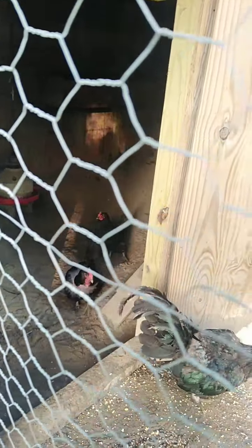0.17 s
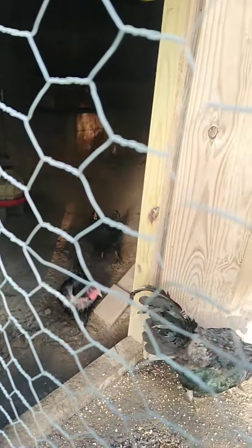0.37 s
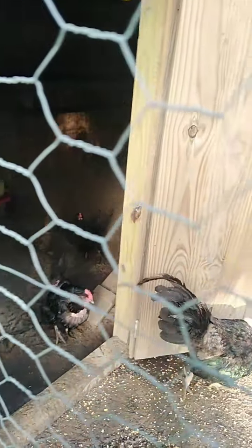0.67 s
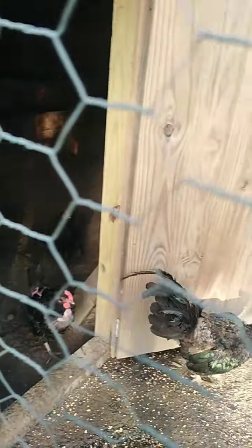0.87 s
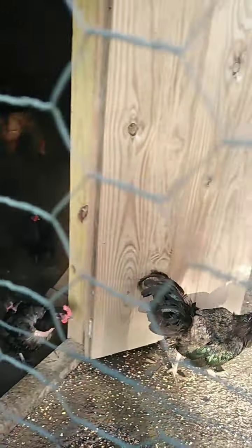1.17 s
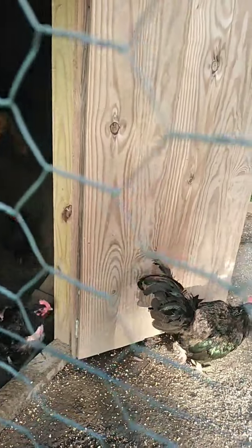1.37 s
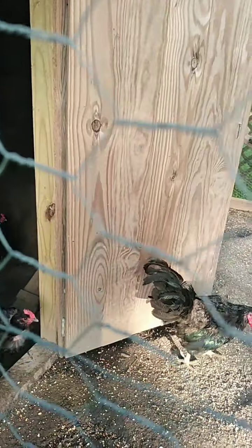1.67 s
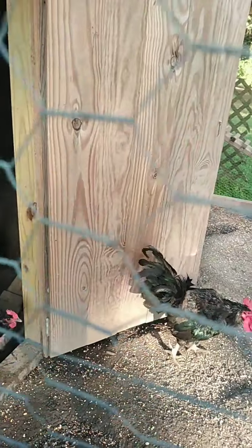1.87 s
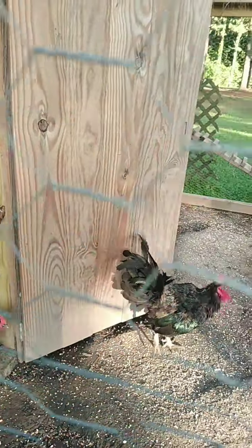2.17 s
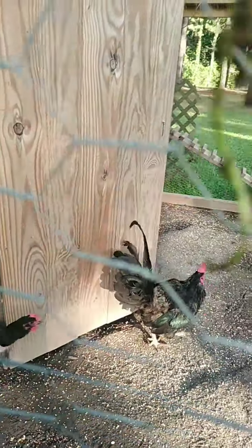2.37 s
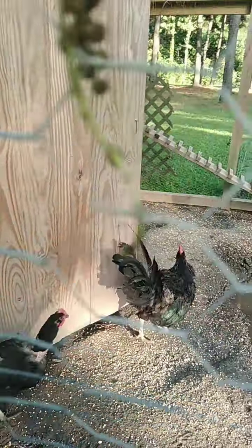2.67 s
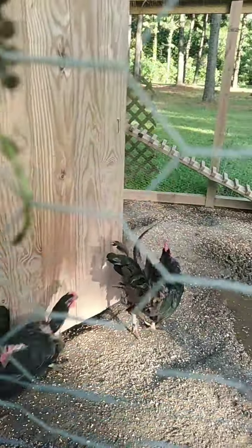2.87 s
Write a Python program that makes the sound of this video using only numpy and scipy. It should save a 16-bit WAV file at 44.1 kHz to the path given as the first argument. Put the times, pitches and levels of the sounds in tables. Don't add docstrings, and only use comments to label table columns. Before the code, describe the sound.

Hens give short throaty clucks beside a wooden coop in an outdoor run, then a shriller bird squawks; wind thumps a handheld stereo microphone, mostly on the right, and feet scuff gravel.

```python
import sys
import numpy as np
from scipy import signal
from scipy.fft import rfft, irfft
from scipy.io import wavfile
from scipy.ndimage import uniform_filter1d, minimum_filter1d

SR = 44100
rng = np.random.default_rng(int(sys.argv[2]) if len(sys.argv) > 2 else 0)


def store_pcm(level_fs):
    pcm = np.round(np.clip(level_fs, -1, 1) * 32767).astype(np.int16)
    wavfile.write(sys.argv[1], SR, np.atleast_2d(pcm).T)


def natural_amplitude(level_db):
    exponent = np.asarray(level_db, float) / 20
    return 10 ** exponent


N = 132300
T = np.arange(N) / SR


def in_time(rows):
    return np.interp(T, *np.transpose(rows))


def at_hz(points, hz):
    p = np.array(points)
    return np.interp(np.log(hz), np.log(p[:, 0]), p[:, 1])


def rms_one(x):
    return x / np.sqrt(np.mean(x ** 2) + 1e-20)


def drift(rate):
    r = np.exp(-20 * np.pi * rate / SR)
    noise = rng.standard_normal(N // 10 + 4002)
    slow = signal.lfilter([1], [1, -2 * r, r * r], noise)[4000:]
    return np.interp(np.arange(N) / 10, np.arange(len(slow)), rms_one(slow - slow.mean()))


def colour(x, points, skirt_db=-40):
    low_end = (points[0][0] / 2, points[0][1] + skirt_db)
    high_end = (points[-1][0] * 2, points[-1][1] + skirt_db)
    ends = [low_end] + list(points) + [high_end]
    hz = np.arange(N // 2 + 1) * SR / N + 1
    return irfft(rfft(x) * natural_amplitude(at_hz(ends, hz)), N)


def swell(t, rise, hold, fall):
    attack = np.sin(np.pi / 2 * np.clip(t / rise, 0, 1)) ** 2
    return attack * np.exp(-np.maximum(t - hold, 0) / fall)


def wind():
    # t/s, level/dB, f/Hz
    gusts = [(0.035, -28, 115), (0.077, -30, 165), (0.126, -28, 108), (0.182, -35.5, 125), (0.403, -36, 94),
             (0.505, -20.5, 138), (0.55, -25.5, 99), (0.59, -43, 119), (0.641, -25.5, 142),
             (0.674, -27, 154), (0.705, -35.5, 129), (0.766, -27, 103.4), (0.955, -30.5, 102.5),
             (0.974, -33.5, 107), (1.004, -33, 120), (1.068, -35, 107), (1.142, -36, 124), (1.312, -39, 76),
             (1.33, -27, 106), (1.358, -23, 97), (1.386, -28.5, 136), (1.402, -44, 108), (1.568, -27, 114),
             (1.598, -22, 124), (1.624, -18, 123), (1.659, -28.5, 144), (1.699, -31, 93.5),
             (1.723, -21.5, 205), (1.781, -24, 173), (1.824, -27.5, 108), (1.854, -24, 136),
             (1.877, -23, 135), (1.909, -21, 193), (1.99, -41, 130), (2.039, -17, 103), (2.072, -15, 196),
             (2.129, -17, 204), (2.157, -29, 98), (2.174, -50, 133), (2.207, -9, 159), (2.226, -17.5, 190),
             (2.245, -13.5, 118), (2.281, -7.5, 179), (2.307, -27, 86.4), (2.325, -14, 150),
             (2.352, -46, 116), (2.37, -37, 152), (2.394, -12.5, 152), (2.414, -17.5, 171),
             (2.43, -18.5, 142), (2.45, -31, 128), (2.505, -23, 147), (2.522, -20.5, 163),
             (2.572, -19.5, 163), (2.597, -28.5, 154), (2.637, -29.5, 137), (2.745, -29, 142),
             (2.768, -17, 135), (2.787, -24, 116), (2.956, -39, 117)]
    # t/s, level/dB
    right_breeze = [(0, -35.5), (.17, -41.5), (.25, -48), (.37, -49.5), (.45, -41), (.8, -39), (.88, -54),
                    (1, -40.5), (1.27, -52), (1.35, -41), (1.97, -34.5), (2.2, -23.5), (2.58, -31.5),
                    (2.68, -41), (2.8, -31.5), (2.88, -43.5), (3, -34)]
    # t/s, level/dB
    left_breeze = [(0, -73), (2.26, -100), (2.3, -57), (2.66, -62), (2.72, -73), (2.8, -58), (3, -63)]
    # f/Hz, level/dB
    breeze_colour = [(30, -107), (50, -1), (90, 5.5), (130, -3.5), (200, -8), (300, -12.5), (450, -23.5),
                     (700, -37)]
    gust_cycles, edge_db, breeze_db = 0.43, -6.5, -2.5
    thumps, push = np.zeros(N), np.zeros(N)
    for (s, db, hz), start in zip(gusts, rng.uniform(-1.04, 1, len(gusts))):
        shape = natural_amplitude(db) * np.exp(-.5 * ((T - s) * hz / gust_cycles) ** 2)
        thumps += shape * np.sin(np.pi * start + 2 * np.pi * hz * (T - s))
        push += shape
    edge = rms_one(colour(rng.standard_normal(N), [(150, -21.5), (300, -20.5), (600, -43.5)]))
    rough = natural_amplitude(edge_db) * edge * push ** 1.67 / push.max() ** .5
    thumps = colour(thumps, [(70, 0.015), (900, 0)], skirt_db=-15) + rough
    left, right = (rms_one(colour(rng.standard_normal(N), breeze_colour) * natural_amplitude(1.17 * drift(8.2)))
                   for _ in "LR")
    return np.array([natural_amplitude(in_time(left_breeze)) * left,
                     thumps + natural_amplitude(in_time(right_breeze) + breeze_db) * right])


def gravel():
    # t/s, level/dB
    scuff = [(0, -40), (.04, -46), (.055, -36.5), (.17, -55), (1.38, -60), (1.44, -37.5), (1.565, -26.5),
             (1.64, -41.5), (1.8, -48), (1.91, -52.5), (1.97, -29), (2.04, -35), (2.06, -34), (2.11, -39),
             (2.46, -48), (2.52, -44), (3, -53)]
    # f/Hz, level/dB
    gravel_colour = [(700, -23), (1500, -5.5), (2500, -2), (3400, -6), (4400, -2), (7000, 8), (9500, -6),
                     (14500, -14.5)]
    # f/Hz, level/dB
    right_shadow = [(1000, -2.5), (2500, -13), (4400, -21), (7000, -9), (14000, -7)]
    # t/s, peak level/dB, length/s
    tick_rows = [(0.283, -30, 0.00087), (0.438, -44, 0.024), (1.292, -45, 0.032), (1.835, -39.5, 0.048),
                 (1.969, -50, 0.00054), (1.999, -30, 0.0015), (2.22, -37, 0.06), (2.626, -43, 0.03),
                 (0.053, -46, 0.0036), (2.91, -47, 0.02)]
    gravel_db, grains_per_s, grain_db = 5.5, 2200, -29
    out, ticks = [], np.zeros(N)
    for s, db, length in tick_rows:
        ticks += natural_amplitude(db + 1.5) * swell(T - s, 0.0007, 0.0016, max(length, .001))
    clump = natural_amplitude(1.17 * drift(140))
    for shadow in ([(100, 0.0066), (200, 0.026)], right_shadow):
        hits = rng.random(N) < grains_per_s / SR
        grains = hits * natural_amplitude(5.3 * rng.exponential(1, N)) * rng.choice([-1, 1], N)
        rasp = natural_amplitude(grain_db) * rms_one(grains) + rng.standard_normal(N)
        rasp = rms_one(colour(rasp, gravel_colour))
        snap = rms_one(colour(rng.standard_normal(N), [(3000, 12), (7000, 27.3), (14000, 11.3)]))
        ground = natural_amplitude(in_time(scuff) + gravel_db) * clump * rasp
        out.append(colour(ground + ticks * snap, shadow, skirt_db=-1.5))
    return np.array(out)


def far_hiss():
    # f/Hz, level/dB
    low_part = [(300, -14), (1000, -5), (1400, 2.5), (1900, -0.5), (2500, 3.5), (3500, -7.5), (4500, 7),
                (5300, -3)]
    # f/Hz, level/dB
    high_part = [(7000, 9.5), (8500, -8), (12000, -14), (13500, -42)]
    hiss_db, right_db = -46, -67
    points = list(low_part) + list(high_part)
    hiss = [rms_one(colour(rng.standard_normal(N), points)) * natural_amplitude(hiss_db + drift(5.1) / 2) for _ in "LR"]
    return hiss * natural_amplitude([[0], [right_db]])


def calls(rows, beaks, throat, release_s, breath_db):
    wobble_depth, shimmer_db = .006, .8
    arch_per_s2, scoop, scoop_s = 12, .025, .005
    out, wobble = np.zeros((2, N)), drift(75)
    breath = rms_one(colour(rng.standard_normal(N), throat))
    k = np.arange(2, 23)[:, None] / 2
    lags = rng.integers(0, N, len(k))
    shimmer = natural_amplitude(shimmer_db * np.sqrt(k) * [np.roll(wobble, lag) for lag in lags])
    for (s, length, db, hz, pan_db), (beak_db, rattle, sag, attack_s) in zip(rows, beaks):
        on = (T >= s) & (T < s + length + 8 * release_s)
        t = T[on] - s
        middle = t - length / 2
        bend = 1 - sag * middle - arch_per_s2 * middle ** 2 - scoop * np.exp(-t / scoop_s)
        phase = 2 * np.pi * np.cumsum(hz * (bend + wobble_depth * wobble[on])) / SR
        open_db = np.clip(np.log2(k * hz / 600), 0, 1) * (beak_db - 80 * t)
        rattle_gain = np.where(k % 1, np.clip(rattle, 0, 1), 1)
        gains = natural_amplitude(at_hz(throat, k * hz) + open_db) * rattle_gain * shimmer[:, on]
        voice = np.sum(gains * np.sin(k * phase - k ** 2 / 2), axis=0)
        voice += natural_amplitude(breath_db + beak_db) * breath[on] * (1 + np.cos(phase))
        ports = natural_amplitude([[db + 5.0], [db + 2.5 - pan_db]])
        out[:, on] += ports * voice * swell(t, attack_s, length, release_s)
    return out


def clucks():
    # t/s, length/s, level/dB, f/Hz, left-right/dB
    rows = [(.488, 0.025, -40.5, 253, -2), (.663, 0.02, -29.5, 314.5, 4), (.778, 0.011, -25, 323, 2),
            (.830, 0.023, -37, 301, -2.5), (.906, 0.015, -30.5, 281.7, 0.5),
            (1.017, 0.027, -28.5, 320.3, 3.5), (1.138, 0.0051, -33, 275, -0.5),
            (1.215, 0.039, -39.5, 303.7, 1), (1.303, 0.044, -30.5, 335.5, 2.5),
            (1.352, 0.018, -29, 302.6, 2), (1.386, 0.0081, -32, 312, 6), (1.557, 0.024, -33.5, 314, 1.5),
            (1.762, 0.033, -32, 347, -2.5), (1.908, 0.068, -30.5, 334.4, -2),
            (2.052, 0.025, -36.5, 304.7, -11), (2.939, 0.019, -37, 293, -2), (2.988, 0.02, -33, 305, -1)]
    # beak opening/dB, half-pitch rattle/0-1, pitch sag/per s, attack/s
    beaks = [(1, .05, -2.5, .006), (0, .05, .3, .014), (6, .25, .2, .004), (7, .3, 7, .003),
             (-6, .1, 1, .006), (0, .03, .1, .007), (6, .4, 3, .003), (-8, .05, 1.5, .002),
             (0, .03, .3, .011), (-8, .15, .5, .006), (-6, .15, .5, .006), (-8, .15, .5, .015),
             (10, .03, .4, .009), (5, .25, -.1, .016), (-8, .05, .3, .015), (-6, .3, -3, .01),
             (6, .25, .3, .002)]
    # f/Hz, level/dB
    throat = [(250, -6), (330, -6.5), (660, 0), (1040, -18), (1350, -35.5), (1900, -26.5), (3100, -29.5),
              (3500, -49)]
    return calls(rows, beaks, throat, release_s=.009, breath_db=-18)


def squawks():
    # t/s, length/s, level/dB, f/Hz, left-right/dB
    rows = [
        (2.219, 0.019, -30, 439, 3),
        (2.236, 0.025, -27.5, 435, -3),
        (2.374, 0.024, -33.5, 358.2, -0.5),
        (2.942, 0.033, -38, 348.6, 2),
    ]
    # beak opening/dB, half-pitch rattle/0-1, pitch sag/per s, attack/s
    beaks = [
        (8, .06, .2, .01),
        (-10, .05, 0, .008),
        (2, .5, -4, .012),
        (6, .5, -4, .02),
    ]
    # f/Hz, level/dB
    throat = [(330, -18), (700, -12), (880, -12), (1100, -18), (1320, -6), (1750, -17), (2200, -32),
              (3000, -42)]
    return calls(rows, beaks, throat, release_s=.007, breath_db=-24)


def coop(x):
    t60_s, wall_cut_hz, scatter = .4, 1000, 1.8
    t = T[:SR // 2]
    tail = rng.standard_normal((2, len(t))) * natural_amplitude(-60 * t / t60_s) * swell(t, .03, 1, 1)
    tail = signal.sosfilt(signal.butter(1, wall_cut_hz, fs=SR, output="sos"), tail)
    tail = tail / np.sqrt(np.sum(tail ** 2) / 2)
    scattered = x[None] * (1 + scatter * drift(144))
    return signal.fftconvolve(scattered, tail, axes=1)[:, :N]


def birds():
    coop_db, gap_hz, gap_width_hz, body_hz, right_dull_hz = -29, 473, 98, 239, 1210
    hens, shrill = clucks(), squawks()
    hens = hens + natural_amplitude(coop_db) * coop((hens + shrill).mean(axis=0))
    hz = np.arange(N // 2 + 1) * SR / N
    gap = 1 - 0.96 * np.exp(-.5 * ((hz - gap_hz) / gap_width_hz) ** 2)
    right_dull = 1 / (1 + (hz / right_dull_hz) ** 3)
    bass_cut = 1 / (1 + (body_hz / (hz + 1)) ** 8)
    ports = np.array([hz ** 0, right_dull]) * bass_cut
    return irfft((rfft(hens) * gap + rfft(shrill)) * ports, N)


def scene():
    return wind() + gravel() + far_hiss() + birds()


def gate(power, hz):
    top_hz, span_db, gate_db, patch_db = 2120, 7, -4, 5
    notch_hz, notch_width_hz, notch_depth_db = 1900, 130, -12
    level = 10 * np.log10(power[0, (hz > 1000) & (hz < 2000)].sum(axis=0) + 1e-20)
    held = -minimum_filter1d(-level, size=17, origin=6)
    idle = np.clip(1.3 - (held - np.percentile(held, 10)) / span_db, 0, 1)
    idle = uniform_filter1d(idle, size=9)
    notch_db = notch_depth_db * np.exp(-.5 * ((hz[:, None] - notch_hz) / notch_width_hz) ** 2)
    patches = rms_one(uniform_filter1d(rng.standard_normal(power.shape), size=24, axis=2))
    sink_db = gate_db + notch_db + patch_db * np.minimum(patches, 1)
    return natural_amplitude(idle * sink_db * (hz < top_hz)[:, None] * (hz > 450)[:, None])


def band_limit(x):
    return signal.sosfilt(signal.butter(12, 15080, fs=SR, output="sos"), x)


def record(dry):
    quell_right, quell_db = 1.3, -16
    hz, _, cells = signal.stft(dry, SR, nperseg=512)
    power = uniform_filter1d(abs(cells) ** 2, size=8, axis=2)
    power = uniform_filter1d(power, size=2, axis=1)
    rest = uniform_filter1d(minimum_filter1d(power, size=90, axis=2), size=15, axis=1)
    rest = rest * [[[0]], [[quell_right]]]
    quell = np.maximum(1 - rest / (power + 1e-20), natural_amplitude(quell_db))
    quelled = signal.istft(cells * gate(power, hz) * quell, nperseg=512)[1][:, :N]
    top_cut = signal.cheby2(12, 60, 15150, fs=SR, output="sos")
    mix = signal.sosfilt(top_cut, quelled)
    return band_limit(mix)


dry = scene()
out = record(dry)
store_pcm(out)
```